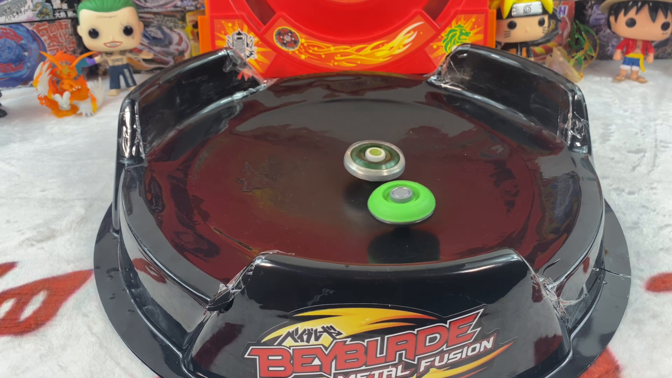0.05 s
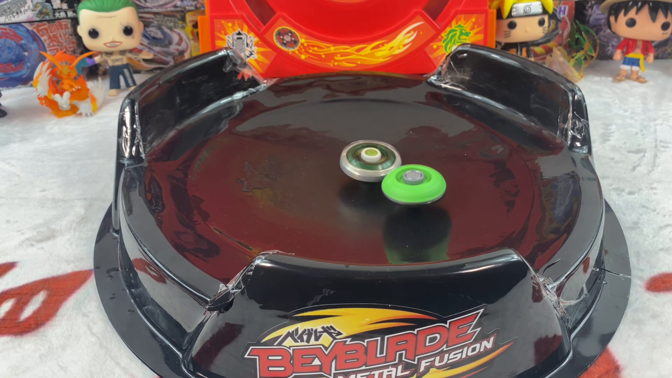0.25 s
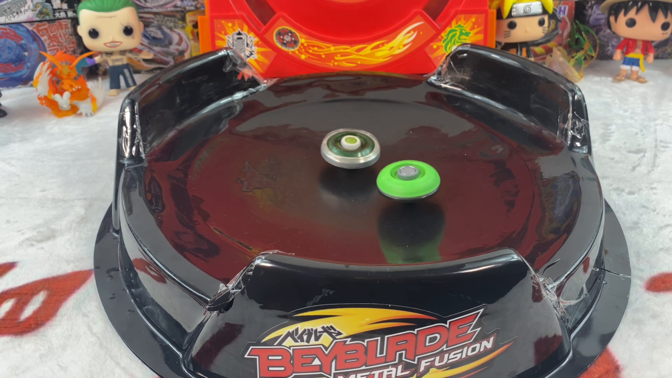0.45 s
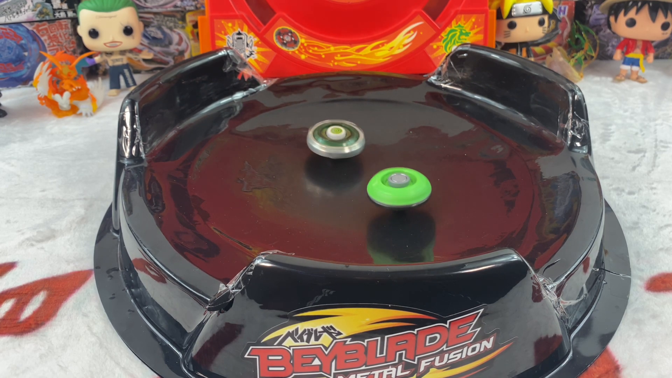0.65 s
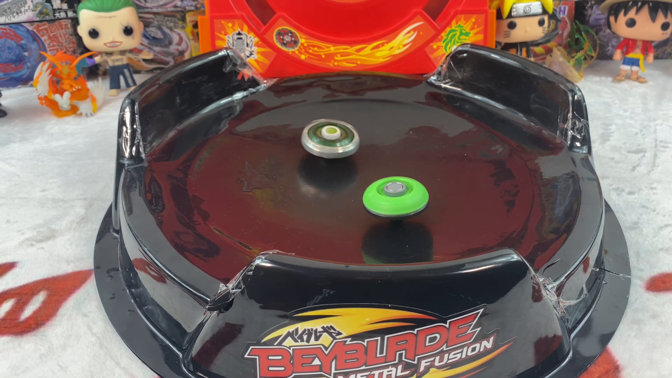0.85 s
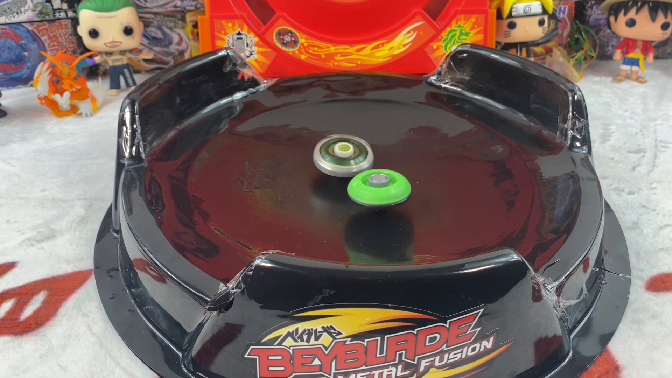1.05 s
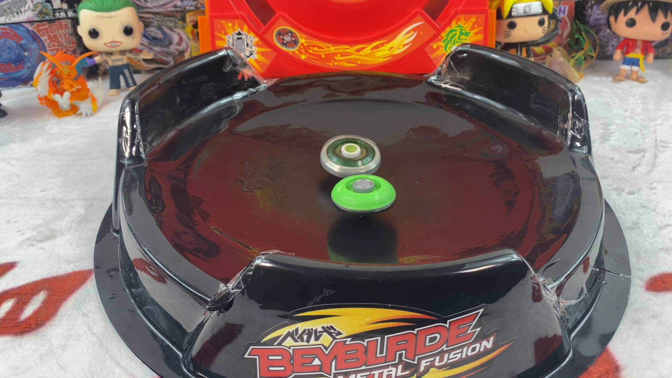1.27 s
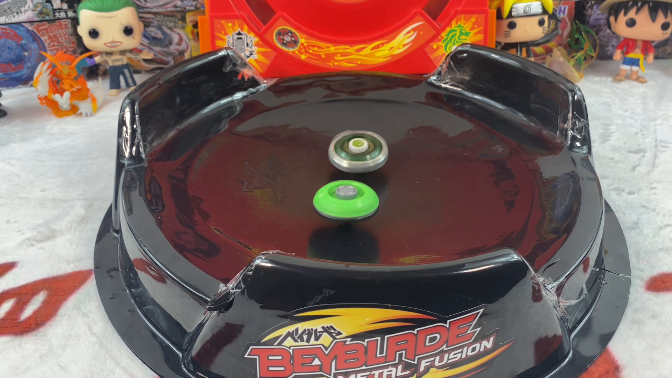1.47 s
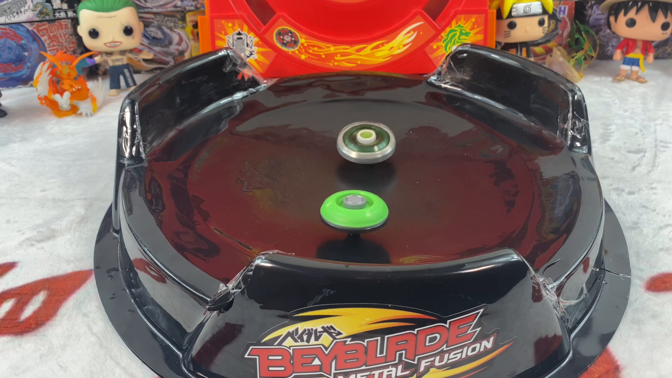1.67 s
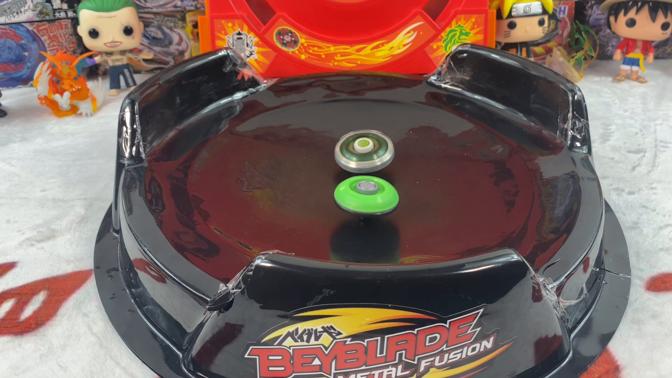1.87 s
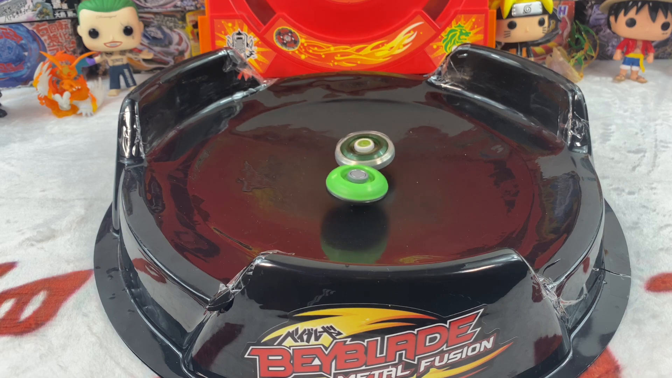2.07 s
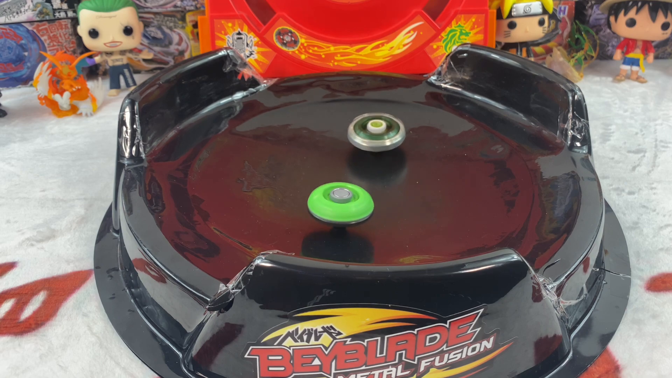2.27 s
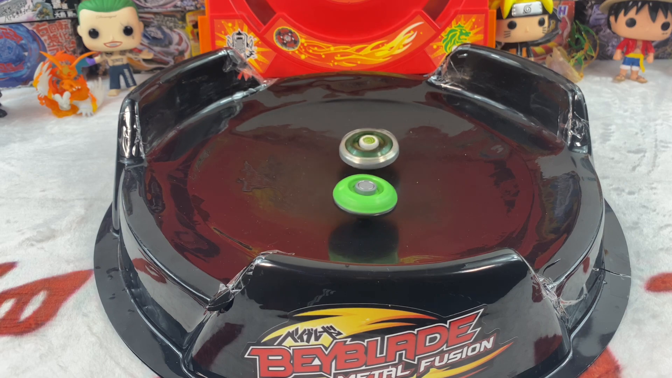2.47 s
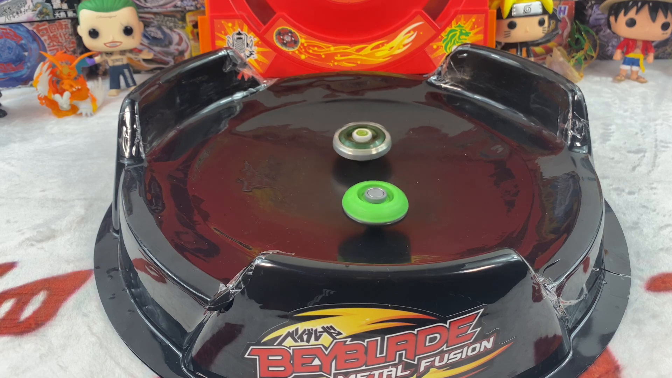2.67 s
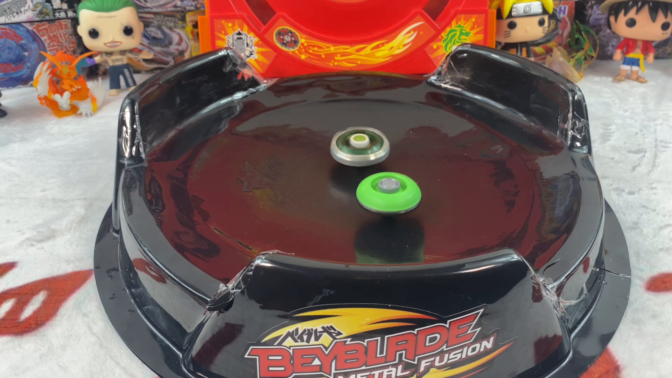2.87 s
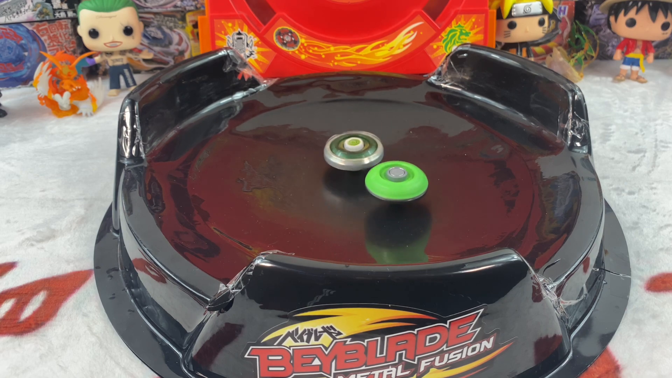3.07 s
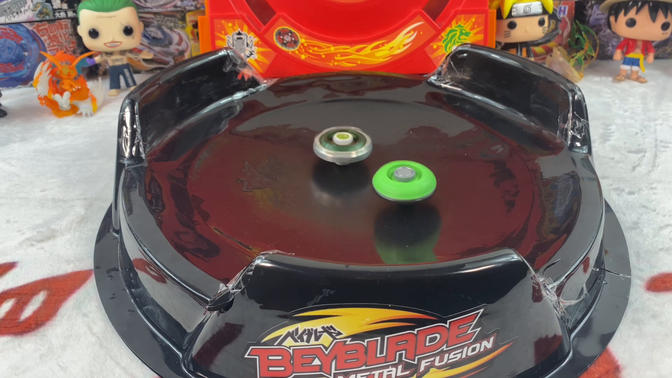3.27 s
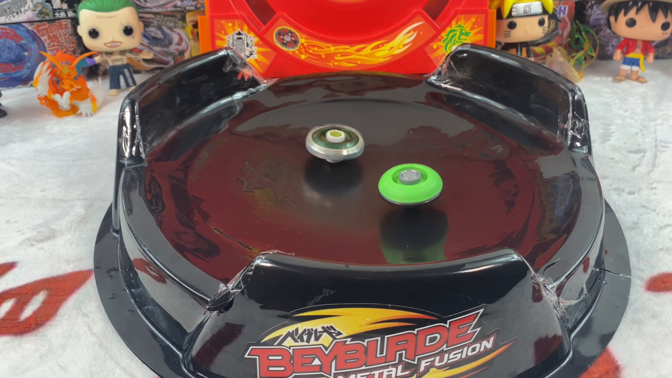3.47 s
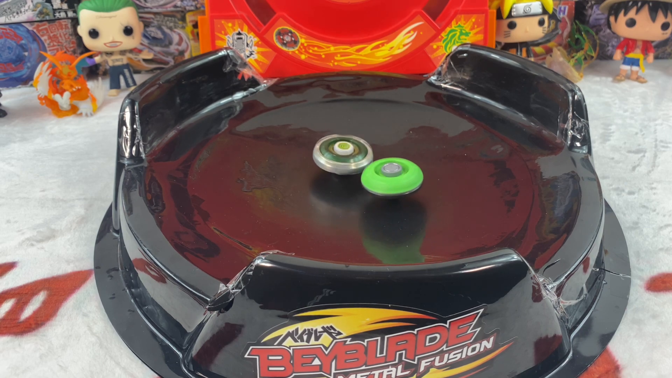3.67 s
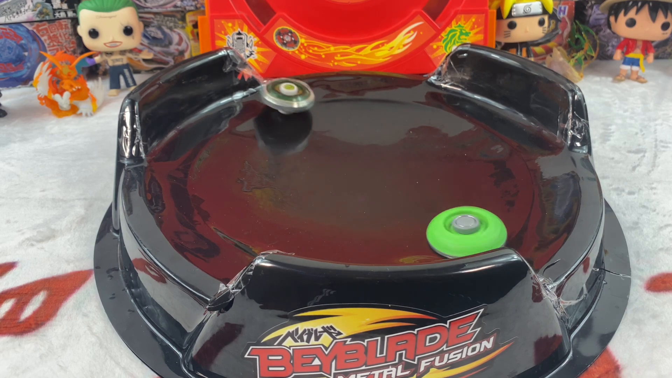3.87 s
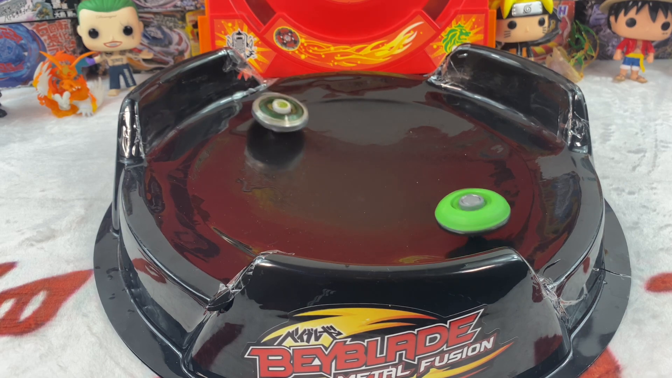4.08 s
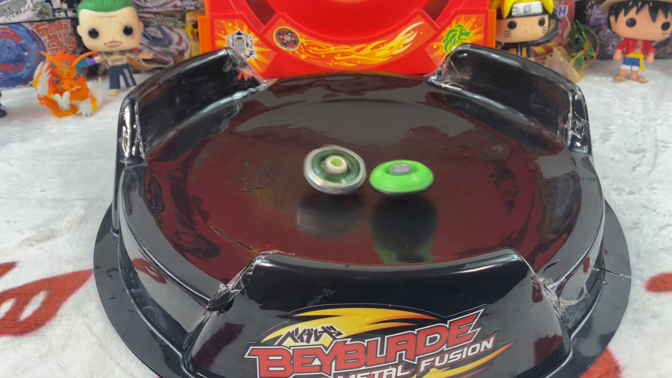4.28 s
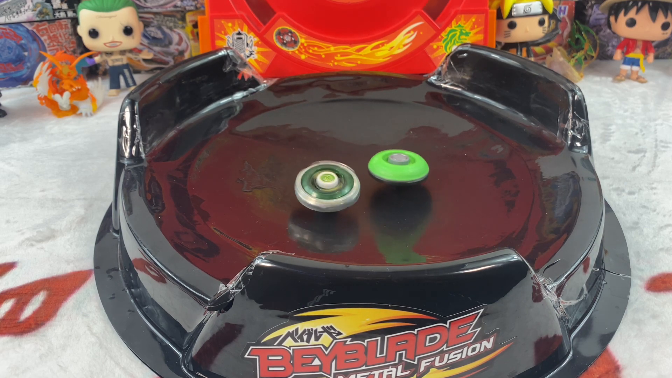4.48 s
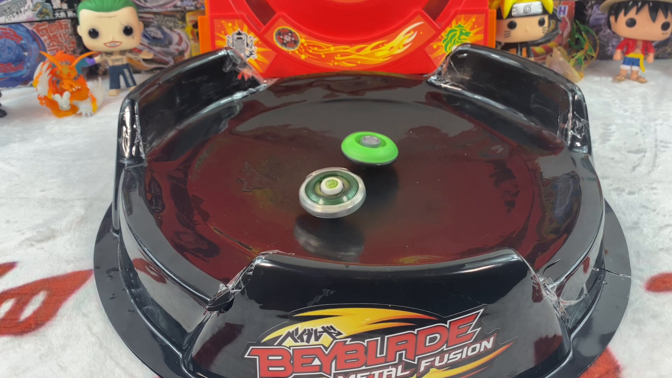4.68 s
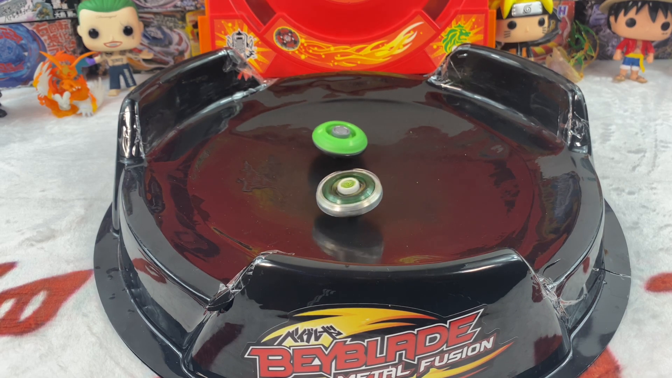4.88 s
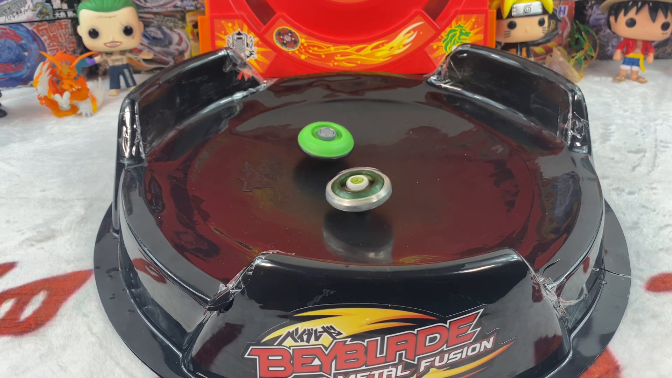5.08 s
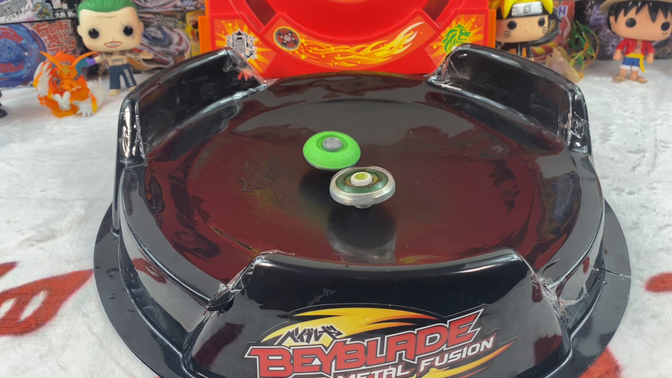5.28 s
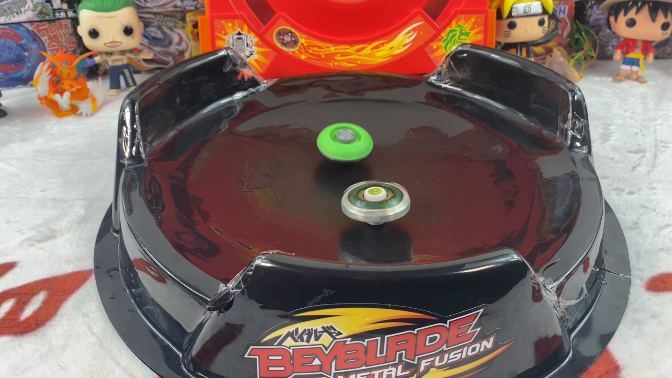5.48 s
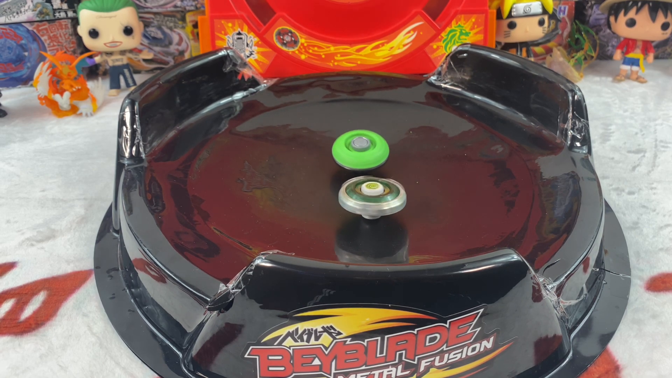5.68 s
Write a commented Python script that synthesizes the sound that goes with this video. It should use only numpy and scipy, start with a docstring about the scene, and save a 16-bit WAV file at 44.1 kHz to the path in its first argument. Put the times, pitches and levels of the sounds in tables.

```python
"""Two metal spinning tops clash again and again in a plastic bowl, close by in a small room.
Each clash is a short rattle of rim on rim that rings the metal wheels and jolts the bowl.
Between clashes the tips whirr and drum on the plastic, loudest when a top is flung up the slope.
Underneath, the faster top's imbalance hums through the bowl, sinking in pitch as it slows.
Late on, the slower top wobbles and knocks its edge on the floor in a fading row."""
import sys
import numpy as np
from scipy import signal
from scipy.io import wavfile
from scipy.ndimage import uniform_filter1d

SR = 44100
rng = np.random.default_rng(int(sys.argv[2]) if len(sys.argv) > 2 else 0)


def pcm_store(signal):
    """Save signal as 16-bit PCM."""
    levels = np.round(np.clip(np.atleast_2d(signal), -1, 1) * 32767)
    wavfile.write(sys.argv[1], SR, levels.astype(np.int16).T)


N = 252893

# room tone (frequency [Hz], level [dB])
AIR_COLOUR = [(20, -9), (100, 8), (400, -14.5), (1000, -28.5), (4000, -33), (11000, -38), (14000, -44.5)]
# reverb decay (frequency [Hz], T60 [s])
ROOM_T60 = [(300, 0.12), (1500, 0.37), (3000, 0.34), (5000, 0.39), (8000, 0.33), (11000, 0.31),
            (15000, 0.067)]
# reverb EQ (frequency [Hz], level [dB])
ROOM_COLOUR = [(300, 10.5), (1500, 2), (3000, -7.5), (4000, 1.5), (4800, -1), (5600, -0.5), (8000, -1.5),
               (11000, -4.5), (13200, -8), (15000, 1.5)]
# slaps off the bowl's rim and nearby things (delay [s], level [dB])
ECHOES = [(.0024, -13), (.0052, -13.5), (.0061, -19.5), (.0083, -18.5), (0.0115, -18.5)]
# the faster top slowing down (time [s], spin [turns/s])
SPIN_RATE = [(0, 53.8), (.28, 53.8), (1.85, 50.5), (2.9, 46.8), (3.7, 45.2), (4.6, 40.6), (5.73, 39.4)]
# how the bowl passes the spin's overtones (frequency [Hz], level [dB])
HUM_COLOUR = [(38, -18.5), (54, 6), (80, -7.5), (110, -4), (165, -9), (210, -10.5), (320, -12), (430, -32),
              (650, -29.5), (1100, -35)]
# the hum rises as the top bears harder on the bowl (time [s], level [dB])
HUM_LEVEL = [(0, -59.5), (.25, -65.5), (.5, -71.5), (1.2, -69), (2, -64.5), (2.4, -64), (2.9, -63.5),
             (3.6, -70.5), (4.3, -60.5), (4.85, -58.5), (5.25, -72.5), (5.73, -68.5)]
# the bowl's deep boom (frequency [Hz], level [dB])
BOOM_COLOUR = [(20, -24.5), (38, -18.5), (54, 7), (68, 3), (82, 13.5), (102, 1), (135, -8), (170, -16),
               (230, -56.5)]
# its hollow drumming (frequency [Hz], level [dB])
DRUM_COLOUR = [(120, -23.5), (195, -5), (220, -13), (256, -2.5), (275, -1.5), (300, 8.5), (355, -5.5),
               (430, -9), (520, -24), (900, -40)]
# a top is flung over the slope and slides on its edge
# (time [s], hold [s], boom [dB], drumming [dB], skid [dB], whirr [dB])
SLIDES = [(3.334, 0.087, -52, -67, -81.5, -67.5), (3.774, 0.093, -41.5, -52.5, -62, -56.5),
          (3.88, 0.034, -59, -43.5, -54, -64.5), (4.008, 0.047, -48.5, -49.5, -62, -83.5),
          (4.311, 0.12, -40, -48.5, -55, -70.5), (4.61, 0.123, -64, -63, -82.5, -80)]
# fader ride of the tips' whirr (time [s], level [dB])
WHIRR_LEVEL = [(0, -85), (.55, -71), (1.35, -73), (1.9, -77.5), (3.6, -70.5), (4.05, -72.5), (4.28, -61.5),
               (4.7, -71.5), (5.05, -82.5), (5.3, -74.5), (5.73, -73.5)]
# metal resonances in the whirr (frequency [Hz], level [dB])
WHIRR_COLOUR = [(800, -23.5), (2000, -14.5), (3400, -12.5), (4050, -10.5), (4330, -2), (4800, -7),
                (5500, -22), (7000, -12.5), (8600, -26), (10600, -16.5), (12800, -33), (16500, -44)]
# scuffed plastic (frequency [Hz], level [dB])
SKID_COLOUR = [(200, -7.5), (420, -1.5), (650, -1), (1100, 0.5), (1500, -8.5), (2300, -10), (3500, -16.5),
               (10000, -28), (13000, -45.5), (16000, -54.5)]
# a top lands on the plastic (time [s], scuff [dB], knock [dB])
LANDINGS = [(3.708, -38, -13.5), (3.786, -38, -20.5), (3.865, -35, -22.5), (4.011, -26.5, -38)]
# knocked plastic (frequency [Hz], level [dB])
KNOCK_COLOUR = [(30, -13.5), (70, 0), (140, 3), (260, -4), (500, -24), (1000, -23), (2000, -38),
                (8000, -61.5), (14000, -77.5)]
# faint low pings after two glancing clashes (time [s], level [dB])
PINGS = [(1.98, -58.5), (2.052, -62)]
# the broad crack of metal on metal (frequency [Hz], level [dB])
CRACK_COLOUR = [(150, -31.5), (550, -34.5), (1000, -17.5), (1400, -18.5), (2000, -7), (2800, -1), (4300, 2),
                (5600, -1), (8400, -2), (10200, -0.5), (12300, -4), (14200, 4.5), (15500, -3),
                (16600, -18.5)]
# main ring of each top's wheel (frequency [Hz], width [Hz], level over the crack [dB])
RIM_MODES = [(4829, 170, 11.5), (4500, 130, 5)]
# lesser wheel resonances (frequency [Hz], width [Hz], level over the crack [dB])
WHEEL_MODES = [(2920, 690, 4.5), (4140, 29, -6), (6910, 900, 6), (10250, 220, 6.5), (11150, 680, 8.5),
               (15200, 220, -0.5)]
# rim meets rim; levels are relative (time [s], energy [dB], rim ring [dB], clack [dB], brightness [dB],
# second contact delay [s], second contact [dB], reverb send [dB], mode favoured by the contact point [Hz],
# its level [dB], bowl boom [dB], bowl drumming [dB])
CLASHES = [ (.2888, 7.5, -2.5, 2, -.5, 0.0069, -13.5, -2.5, 3950, 4, -47, -53.5),
           (0.5999, 10, 2.5, -1.5, 3.5, .0074, -17, 0.5, 10180, 6.5, -50, -55.5),
           (1.1026, 8, 7, 1, 3, .006, -8, -2, 4130, 9.5, -58, -67.5),
           (1.4403, 8.5, 1.5, 4, 4, 0.0015, 0.5, -0.5, 3110, -8.5, -45.5, -50.5),
           (1.9771, 7, 5, -4, -0.5, 0.0001, 18, -2, 9900, 3.5, -50.5, -66),
           (2.0514, -3, -8, -1, -5, 0.0016, -20, 1, 2700, 9.5, -61, -72),
           (2.106, 10.5, 7, 0.5, 3.5, 0.005, -2.5, 0.5, 11570, -2, -46.5, -54.5),
           (2.568, 9.5, 5.5, 1.5, 2, 0.0024, -10.5, 1, 1098, 3.5, -43, -56),
           (3.0335, 5.5, -3.5, -5, -3, 0.0073, -8, 2.5, 2800, 16, -50.5, -60),
           (3.2359, 9.5, 9.5, 3, 8.5, 0.0026, -10, 1.5, 7120, 14.5, -54, -62),
           (3.708, 8, 2, 0.5, 5.5, 0.0029, -13.5, 2, 10760, 14.5, -50, -54),
           (4.3117, 11, 2, -4, 5.5, .0023, -1, 0, 6705, 14, -43.5, -54),
           (4.599, 2.5, -6, -.5, -3, 0.00089, 10, 0, 2463, 10.5, -46.5, -54),
           (5.3385, 7.5, -5, -0.5, -0.5, 0.0033, 3, 6, 5400, 9, -51, -64)]

TOP_END_HZ = 16700
SLIDE_RISE_S, SLIDE_FALL_DB_PER_S, BOOM_FALL_DB_PER_S = 0.019, 181.5, 91


def amp(db):
    """Decibels to gain."""
    return 10 ** (np.asarray(db) / 20)


def unit_energy(x):
    """Scales to a mean channel energy of one."""
    return x / np.sqrt(np.mean(np.sum(x ** 2, -1)) + 1e-20)


def unit_rms(x):
    """Scales to an rms of one."""
    return x / np.sqrt(np.mean(x ** 2) + 1e-20)


def read(points, hz):
    """Reads a spectrum on a log-frequency axis."""
    f, value = np.transpose(points)
    return np.interp(np.log(hz + 1), np.log(f), value)


def curve(points):
    """Reads a control curve at every sample."""
    return np.interp(np.arange(N) / SR, *np.transpose(points))


def add(mix, s, sound):
    """Mixes a sound in at time s."""
    part = mix[..., max(round(s * SR), 0):][..., :sound.shape[-1]]
    part += sound[..., :part.shape[-1]]


def eq(x, db_of, size=4096):
    """Minimum-phase EQ whose gain in dB is a function of frequency."""
    log_gain = np.log(amp(db_of(abs(np.fft.fftfreq(size, 1 / SR)))))
    taps = np.fft.ifft(np.exp(np.conj(signal.hilbert(log_gain)))).real
    return signal.fftconvolve(x, np.atleast_2d(taps), axes=1)[:, :x.shape[1]]


def shaped(x, points):
    """Gives a sound a colour and an rms of one."""
    return unit_rms(eq(x, lambda hz: read(points, hz)))


def stereo_noise(count, width):
    """White noise built from mid and side."""
    mid, side = rng.standard_normal((2, count))
    return np.array([mid + width * side, mid - width * side])


def drift(size):
    """Random wander of rms one, smoothed over size samples."""
    return unit_rms(uniform_filter1d(uniform_filter1d(rng.standard_normal(N), size), size))


def steadied(x, size):
    """Evens out the slow swells of a narrow rumble."""
    return x / np.sqrt(abs(uniform_filter1d((x ** 2).mean(0), size)) + 1e-9)


def whitened(x, bins=41, size=4096):
    """Flattens the broad humps in a burst's spectrum, so that the metal sets its colour."""
    power = uniform_filter1d((abs(np.fft.fft(x, size)) ** 2).mean(0), bins, mode="wrap")
    return eq(x, lambda hz: -10 * np.log10(power + 1e-9), size)


def swell(start, rise_s, hold_s, fall_db_per_s):
    """Envelope that rises, holds and dies away."""
    t = np.arange(N) / SR - start
    return np.clip(t / rise_s, 0, 1) * amp(-fall_db_per_s * np.maximum(t - rise_s - hold_s, 0))


def room_air(level_db=-79):
    """A faint, dark bed of room tone."""
    return amp(level_db) * shaped(stereo_noise(N, width=0.63), AIR_COLOUR)


def room_tail(build_s=0.0018):
    """The small room's diffuse tail; lows and the highest treble die first."""
    hz, t, bands = signal.stft(stereo_noise(SR * 3 // 4, width=0.99), SR, nperseg=256)
    decay = amp(read(ROOM_COLOUR, hz)[:, None] - 60 * t / read(ROOM_T60, hz)[:, None])
    tail = signal.istft(bands * decay, SR, nperseg=256)[1]
    fade_in = 1 - np.exp(-(np.arange(tail.shape[1]) / SR / build_s) ** 2)
    return unit_energy(tail * fade_in)


def early_echoes(x, spread_s=0.00025):
    """Close surfaces answer within milliseconds; the paths shift from clash to clash."""
    out = x.copy()
    for s, db in ECHOES:
        for ear in range(2):
            add(out[ear], s + spread_s * rng.standard_normal(), amp(db) * x[ear])
    return out


def turns_made():
    """The faster top's running count of turns."""
    return np.cumsum(curve(SPIN_RATE)) / SR


def hum(harmonics=21, waver_db=3.5, pan_db=1.34):
    """An unbalanced top shakes the bowl once a turn; each overtone wavers as it roams."""
    hz, turns = curve(SPIN_RATE), turns_made()
    tone = 0
    for k in range(1, harmonics + 1):
        level_db = read(HUM_COLOUR, k * hz) + waver_db * drift(size=7000)
        tone = tone + amp(level_db) * np.sin(2 * np.pi * (k * turns + rng.random()))
    return tone * amp(curve(HUM_LEVEL)) * amp([[-pan_db], [pan_db]])


def slide_power(column, fall_db_per_s=SLIDE_FALL_DB_PER_S):
    """A top sliding on its edge swells the layer in this column of SLIDES."""
    return sum((amp(row[column]) * swell(row[0], SLIDE_RISE_S, row[1], fall_db_per_s)) ** 2
               for row in SLIDES)


def jolt_power(column, **envelope):
    """A jolted top rocks back upright and shakes the bowl, by this column of CLASHES."""
    return sum((amp(row[column]) * swell(row[0], **envelope)) ** 2 for row in CLASHES)


def bowl(idle_boom_db=-73.5, boom_trim_db=-1.5, drum_vs_hum_db=-11.5, pan_db=1.54):
    """The thin plastic floor booms and drums under the tips, harder after a clash and in a slide."""
    boom_power = amp(idle_boom_db) ** 2 + slide_power(column=2, fall_db_per_s=BOOM_FALL_DB_PER_S)
    boom_power += jolt_power(column=-2, rise_s=0.057, hold_s=0.009, fall_db_per_s=92)
    drum_power = amp(drum_vs_hum_db + curve(HUM_LEVEL)) ** 2 + slide_power(column=3)
    drum_power += jolt_power(column=-1, rise_s=0.0052, hold_s=0.033, fall_db_per_s=310)
    boom = steadied(shaped(stereo_noise(N, width=0.15), BOOM_COLOUR), size=4000) * np.sqrt(boom_power)
    drum = steadied(shaped(stereo_noise(N, width=0.33), DRUM_COLOUR), size=3000) * np.sqrt(drum_power)
    return (amp(boom_trim_db) * boom + drum) * amp([[-pan_db], [pan_db]])


def tips(press_db=2.5, grit_db=2.5, skid_vs_hum_db=-18):
    """Spinning tips whirr in the metal's resonances, harder once a turn, and scuff the plastic unevenly."""
    pressure = amp(press_db * np.cos(2 * np.pi * turns_made()))
    whirr = shaped(stereo_noise(N, width=0.28) * pressure, WHIRR_COLOUR)
    grit = amp(grit_db * drift(size=130))
    skid = shaped(stereo_noise(N, width=0.52) * grit, SKID_COLOUR)
    whirr_power = amp(curve(WHIRR_LEVEL)) ** 2 + slide_power(column=5)
    skid_power = amp(skid_vs_hum_db + curve(HUM_LEVEL)) ** 2 + slide_power(column=4)
    return whirr * np.sqrt(whirr_power) + skid * np.sqrt(skid_power)


def tap(scuff_db, knock_db, scuff_s=0.0084):
    """One knock on the plastic floor with a brief scuff from the turning top."""
    t = np.arange(SR // 10) / SR
    scuff = unit_energy(shaped(stereo_noise(len(t), width=1.0) * np.exp(-t / scuff_s), SKID_COLOUR))
    knock = unit_energy(shaped(signal.unit_impulse(len(t))[None], KNOCK_COLOUR))
    return amp(scuff_db) * scuff + amp(knock_db) * knock


def wobble(start_s=4.634, turn_s=0.041, turns=10):
    """Knocked askew, the slower top dips its edge once a turn, ever lighter as it rights itself."""
    mix = np.zeros((2, N))
    for turn in range(turns):
        dip = tap(scuff_db=-29 - 0.5 * turn ** 2, knock_db=-23 - 0.2 * turn ** 2)
        add(mix, start_s + turn * turn_s, dip)
    return mix


def ping(db, hz=899, t60_s=0.2):
    """A faint, pure ring after a glancing clash."""
    t = np.arange(SR // 4) / SR
    return amp(db - 60 * t / t60_s) * np.sin(2 * np.pi * hz * t)


def rim_grind(count, again_s, again_db, bite_s=0.00055, chatter_s=0.012, chatter_db=-20):
    """Toothed rims bite for a millisecond, chatter and catch a second time."""
    t = np.arange(count) / SR
    contact = t / bite_s * np.exp(1 - t / bite_s) + amp(chatter_db) * np.exp(-t / chatter_s)
    second_contact = amp(again_db) * np.interp(t - again_s, t, contact, left=0)
    left, right = whitened(np.hypot(contact, second_contact) * stereo_noise(count, width=0.96))
    return np.array([left, np.pad(right, (1, 0))[:count]])  # reaches the right a sample later


def resonance(hz, centre_hz, width_hz, db):
    """Power response of one damped mode of the metal."""
    return amp(db) ** 2 / (1 + (2 * (hz - centre_hz) / width_hz) ** 2)


def clash(energy_db, ring_db, clack_db, bright_db, again_s, again_db, room_db, mode_hz, mode_db,
          mode_width_hz=300, ripple_db=2.36, ripple_points=180, wet_db=-10):
    """The grind of rim on rim cracks and rings both wheels; the room answers."""
    tail = amp(wet_db + room_db) * room_tail()
    direct = unit_energy(early_echoes(rim_grind(tail.shape[1], again_s, again_db)))
    tone = [(3000, clack_db), (5000, 0), (8000, 0), (12000, bright_db)]
    rims = [(hz, width, db + ring_db) for hz, width, db in RIM_MODES]
    modes = [*rims, *WHEEL_MODES, (mode_hz, mode_width_hz, mode_db)]
    # the many small modes of tops and bowl are struck differently every time
    ripple_hz = np.geomspace(CRACK_COLOUR[1][0], TOP_END_HZ, ripple_points)
    ripple = np.transpose([ripple_hz, ripple_db * rng.standard_normal(ripple_points)])

    def metal_db(hz):
        """The broad crack with the wheels' resonances standing on it."""
        peaks = sum(resonance(hz, *mode) for mode in modes)
        return read(CRACK_COLOUR, hz) + read(tone, hz) + read(ripple, hz) + 10 * np.log10(1 + peaks)

    return amp(energy_db) * unit_energy(eq(direct + tail, metal_db))


def scene(clash_gain_db=3, reverb_send_db=-9):
    """The small sounds share a reverb; clashes sit on top, with bowl, hum and air dry beneath."""
    mix = tips() + wobble()
    for s, scuff_db, knock_db in LANDINGS:
        add(mix, s, tap(scuff_db, knock_db))
    for s, db in PINGS:
        add(mix, s, ping(db))
    mix += amp(reverb_send_db) * signal.fftconvolve(mix, room_tail(), axes=1)[:, :N]
    for s, *blow, _boom_db, _drum_db in CLASHES:
        add(mix, s, amp(clash_gain_db) * clash(*blow))
    return mix + bowl() + hum() + room_air()


def record(dry):
    """Soft clipping rounds the sharpest peaks; a low-pass trims the top end."""
    low_pass = signal.firwin(301, TOP_END_HZ, window=("kaiser", 9), fs=SR)
    return signal.oaconvolve(np.tanh(dry), low_pass[None], "same")


dry = scene()
out = record(dry)
pcm_store(out)
```